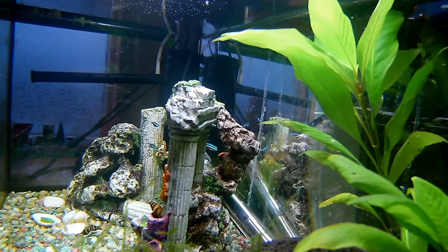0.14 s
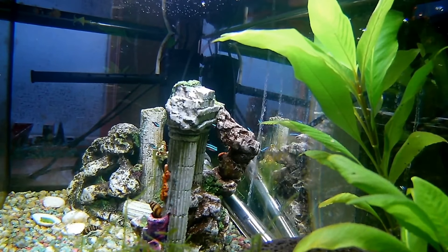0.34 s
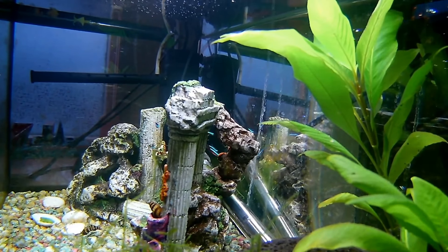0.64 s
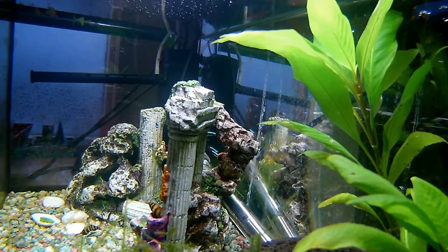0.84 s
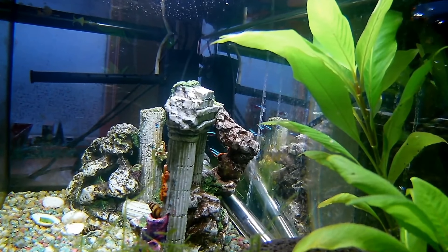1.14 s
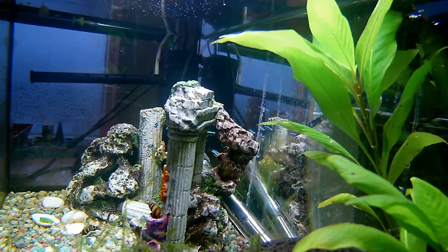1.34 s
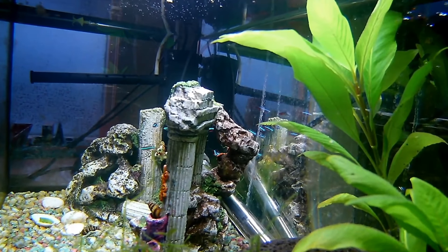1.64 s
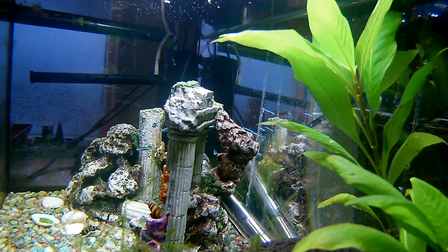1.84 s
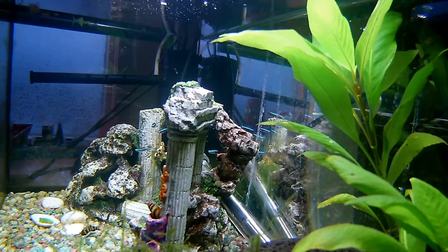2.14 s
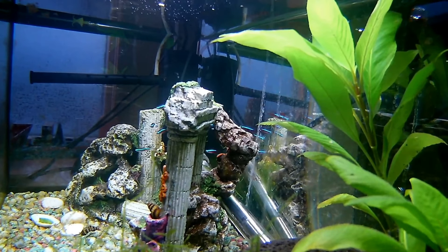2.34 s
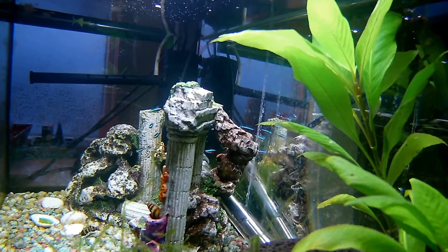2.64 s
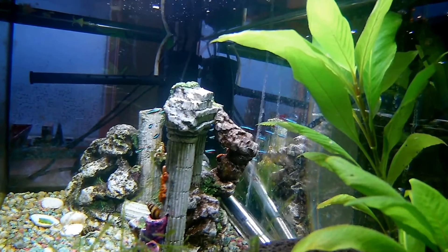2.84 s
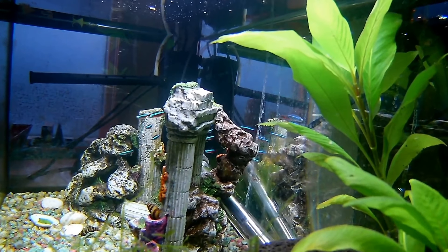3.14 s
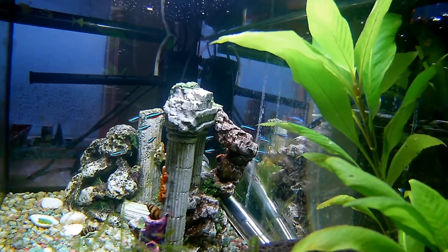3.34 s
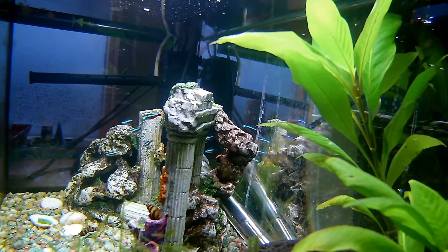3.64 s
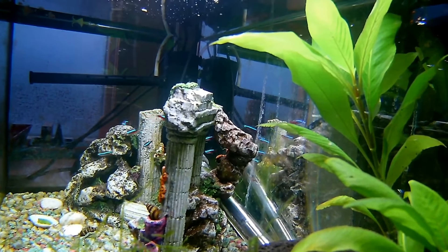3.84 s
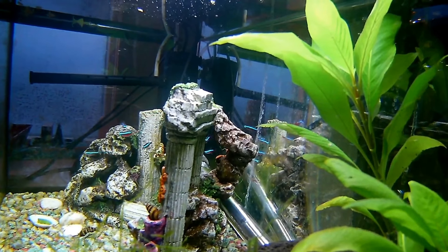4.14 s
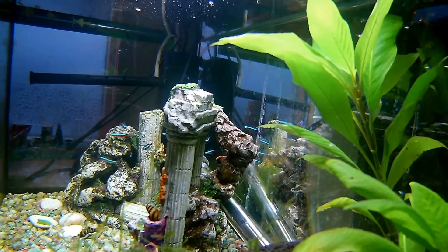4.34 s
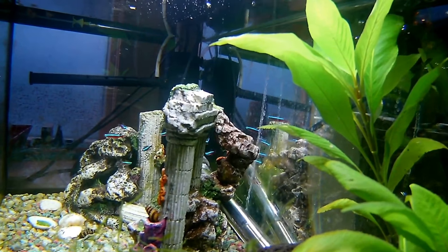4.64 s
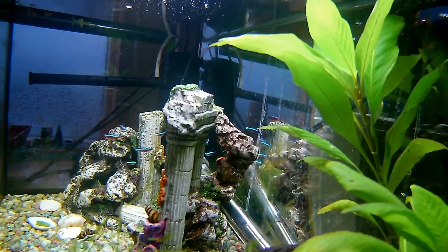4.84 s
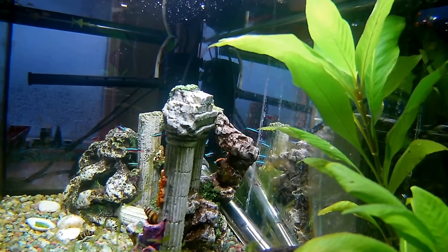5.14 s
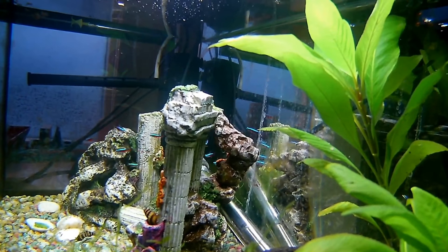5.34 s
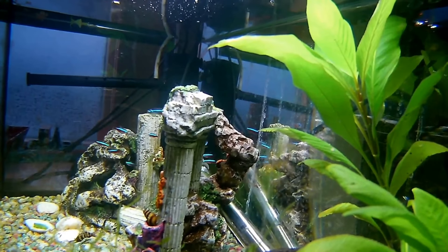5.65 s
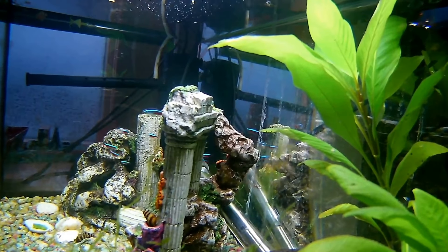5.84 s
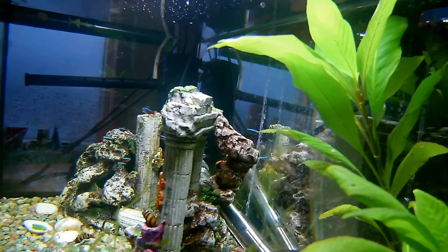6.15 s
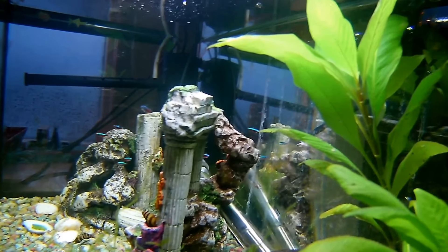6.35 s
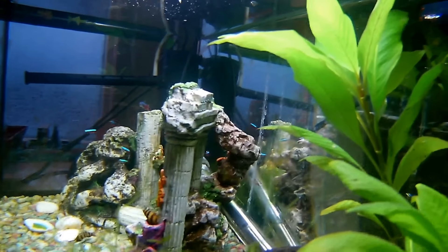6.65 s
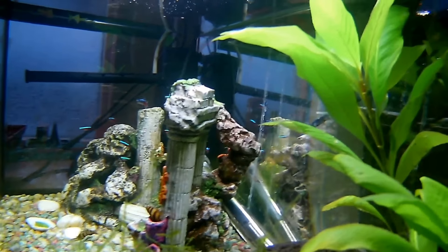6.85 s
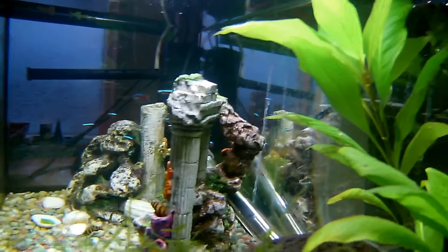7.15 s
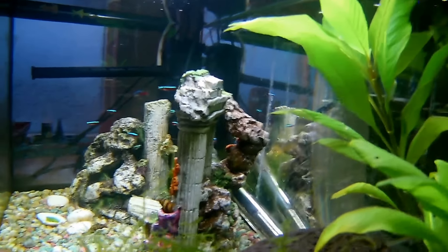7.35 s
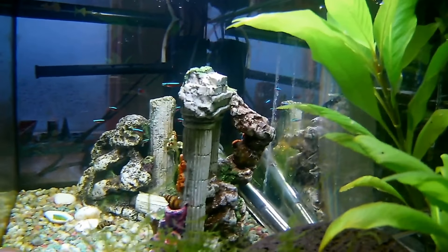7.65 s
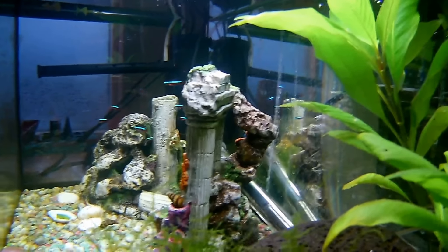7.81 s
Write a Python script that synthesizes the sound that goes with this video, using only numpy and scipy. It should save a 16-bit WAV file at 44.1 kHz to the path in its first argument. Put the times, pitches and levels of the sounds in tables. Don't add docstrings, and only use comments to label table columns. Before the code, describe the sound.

A fish tank filter pump drones steadily at a low mains pitch, with a soft rumbling of glass and faint gurgling from churned water. Very little changes for over six seconds. Then the hand-held device shifts with a low rumble and is knocked hard against its stand, a loud dry crack, followed by light fingertip taps, soft thuds and rustles over the continuing hum. Close, plain indoor pickup with slight hiss.

```python
import sys
import numpy as np
from scipy import signal
from scipy.fft import rfft, irfft, next_fast_len
from scipy.io import wavfile
from scipy.ndimage import uniform_filter1d

SR = 44100
rng = np.random.default_rng(int(sys.argv[2]) if len(sys.argv) > 2 else 0)


def invert_db(x):
    u = np.asarray(x, float) / 20
    return 10 ** u


def generate_wav(sig):
    pcm = np.round(np.clip(np.atleast_2d(sig).T, -1, 1) * 32767).astype(np.int16)
    wavfile.write(sys.argv[1], SR, pcm)


N = 351918


def shaped(gain, excite):
    size = next_fast_len(N)
    hz = np.maximum(np.arange(size // 2 + 1) * SR / size, 1e-3)
    spectrum = rfft(excite, size) * gain(hz) * np.sqrt(SR / 2)
    return irfft(spectrum, size)[:N]


def walk(rate):
    hold = int(SR / rate)
    steps = np.repeat(rng.standard_normal(N // hold + 1), hold)
    smooth = uniform_filter1d(uniform_filter1d(steps, hold), hold)
    return 1.3 * smooth[:N]


# (multiple of mains, level [dB rms])
HUM_LINES = [(1, -43), (2, -56), (3, -46), (4, -54.5), (5, -57), (6, -48.5), (7, -68), (8, -65), (9, -62.5),
             (10.5, -73.5), (11, -71), (12, -64)]
# (time [s], level [dB])
LEANING_LEVELS = [
    (0, -1),
    (5.2, 0),
    (5.7, 4.5),
    (6.4, 2),
    (6.7, -8),
    (7.0, 3),
    (7.5, 7),
    (7.98, -5),
]


def motor():
    mains_hz, wobble_db = 50.0, 0.35
    phase = 2 * np.pi * np.cumsum(mains_hz + 0.04 * walk(0.7)) / SR
    leaning_db = np.interp(np.arange(N) / SR, *np.transpose(LEANING_LEVELS))
    hum = np.zeros(N)
    for multiple, db in HUM_LINES:
        level_db = db + wobble_db * np.sqrt(multiple) * walk(3)
        if multiple == 2:
            level_db = level_db + leaning_db
        lag = 0.55 * multiple ** 2 + 2.3
        hum += np.sqrt(2) * invert_db(level_db) * np.cos(multiple * phase - lag)
    return hum


def ringing(modes, shared_db, flicker_db, rate):
    out = np.zeros(N)
    for hz, width, db in modes:
        turbulence, flicker = rng.standard_normal(N), walk(rate)
        glint_db = flicker_db * (flicker + 0.3 * flicker ** 2)
        drive = turbulence * invert_db(shared_db + glint_db)

        def resonance(f):
            detuning = 1.424 * (f - hz * hz / f) / 2 / width
            return invert_db(db) / (1 + detuning ** 2) ** 1.54

        out += shaped(resonance, drive)
    return out


# (frequency [Hz], width [Hz], level [dB per Hz])
TANK_MODES = [(35, 22, -74), (110, 48, -76.5), (182, 39, -71.5), (209, 7.9, -64), (245, 37, -67.5),
              (277.5, 65, -73), (317, 180, -80.5), (391.4, 48, -74.5), (450, 55, -74.5), (651, 40, -73.5),
              (703, 49, -77.5), (797, 118, -79.5), (916, 27, -85)]
# (frequency [Hz], width [Hz], level [dB per Hz])
HOUSING_MODES = [(970, 94, -95.5), (1149, 145, -90.5), (1338, 45, -84), (1528, 144, -87.5),
                 (1716, 108, -83), (1856, 76, -85), (2001, 125, -82.5), (2262, 215, -87.5), (2534, 46, -94),
                 (2780, 120, -97), (3185, 244, -90), (3960, 340, -103), (4314, 170, -106)]


def water():
    surge_db = 0.4 * walk(5) + 1.1 * walk(35)
    tank = ringing(TANK_MODES, 0.3 * surge_db, flicker_db=0.6, rate=6)
    housing = ringing(HOUSING_MODES, surge_db, flicker_db=1.4, rate=22)
    return tank + housing


# (frequency [Hz], level [dB per Hz])
HISS_CURVE = [(30, -93), (150, -82.5), (550, -81), (1000, -90.5), (2400, -100), (4900, -117), (7500, -123),
              (15500, -120)]


def hiss():
    hz, db = np.transpose(HISS_CURVE)
    return shaped(lambda f: invert_db(np.interp(np.log(f), np.log(hz), db)), rng.standard_normal(N))


# (time [s], rumble level [dB], rustle level [dB], length [s])
GRIP_CHANGES = [(5.1, -62, -105, .1), (6.25, -60, -105, .15), (6.468, -43.5, -100, 0.23),
                (6.807, -35, -80.5, .06), (6.99, -45, -104, .04), (7.19, -47, -84, 0.068),
                (7.303, -46, -80, 0.069), (7.43, -42, -88, 0.089), (7.713, -46, -91, .06),
                (7.874, -40, -88, 0.026), (7.964, -44, -100, .03)]


def grips(column, late_s, longer):
    rows, t = np.array(GRIP_CHANGES), np.arange(N) / SR
    since = (t - rows[:, :1] - late_s) / (longer * rows[:, 3:])
    fade = np.where(since < 0, (since / 0.59) ** 2, since)
    return invert_db(rows[:, column]) @ np.exp(-fade)


def hands():
    def bass(f):
        low_cut = (f / 18) ** 2 / (1 + (f / 18) ** 2)
        return low_cut / (1 + (f / 150) ** 2) / 10

    def skin(f):
        return 1 / (1 + ((f - 4500) / 1800) ** 4) / 50

    rumble = shaped(bass, rng.standard_normal(N)) * invert_db(2 * walk(15))
    rustle = shaped(skin, rng.standard_normal(N)) * invert_db(3 * walk(150))
    return rumble * grips(1, late_s=0, longer=1) + rustle * grips(2, late_s=0.045, longer=1.4)


# (frequency [Hz], level [dB], time to fall 60 dB [s])
BODY_MODES = [(90, -11, 0.015), (120, -24.5, 0.25), (190, -16.5, 0.044), (244.3, -9, 0.17),
              (276, -3.5, 0.09), (356, 10.5, 0.034), (432, -11, 0.036), (497, 7, 0.025), (578, 0, 0.049),
              (640, -0.5, 0.052), (804, 22.5, 0.014), (1010, -10.5, .02), (1208, 21.5, 0.017),
              (1440, -20, .02)]
# (time [s], signed force, struck spot [Hz], spread [octaves], ring time [times the free body's])
KNOCK_HITS = [
    (6.777, 1.68, 382, 1, 1.26),
    (6.7784, -1.25, 391, 1.15, 0.21),
    (6.7847, 1, 389, 0.74, 0.85),
    (6.7900, 0.00033, 237, 0.23, 1.7),
    (6.7970, -0.074, 262, 0.21, 0.58),
    (6.8150, .02, 640, 0.14, 2.7),
]
# (time [s], signed force, struck spot [Hz], spread [octaves])
FINGER_TAPS = [(6.9800, 0.12, 357, 0.52), (6.986, -0.065, 250, 0.85), (7.0365, 0.017, 820, 0.45),
               (7.1703, 0.032, 360, 0.55), (7.1975, 0.034, 800, 0.41), (7.1982, -.075, 340, 0.44),
               (7.2276, -0.03, 400, 0.3), (7.2301, 0.057, 430, 0.51), (7.2490, 0.042, 372, 0.34),
               (7.3100, -0.016, 250, .6), (7.3245, 0.08, 420, 0.6), (7.3272, -0.1, 557, 0.26),
               (7.336, 0.03, 600, 0.16), (7.4065, -0.039, 750, .5), (7.4083, 0.015, 1490, 0.085),
               (7.8763, 0.12, 460, 0.47), (7.8784, 0.074, 352, 0.12)]
# (time [s], signed force, struck spot [Hz])
SOFT_THUDS = [(6.778, -0.19, 110), (6.803, 0.074, 125), (6.8400, 0.047, 200), (6.8550, 0.058, 115),
              (6.996, -0.017, 90), (7.3280, 0.035, 200), (7.425, 0.02, 200), (7.407, .04, 190),
              (7.8784, -0.036, 88), (7.9250, -0.01, 120), (7.947, 0.027, 100), (7.965, -0.042, 132)]


def taps():
    out, t = np.zeros(N + SR), np.arange(SR // 3) / SR
    hz, db, t60 = np.transpose(BODY_MODES)
    hits = list(KNOCK_HITS)
    for s, force, spot_hz, spread in FINGER_TAPS:
        hits.append((s, force, spot_hz, spread, 0.63 / spread ** 0.48))
    for s, force, spot_hz in SOFT_THUDS:
        hits.append((s, force, spot_hz, 0.59, 0.98))
    for s, force, spot_hz, spread, ring_time in hits:
        octaves_away = np.log2(hz / spot_hz)
        share = invert_db(db) * np.exp(-0.5 * (octaves_away / spread) ** 2)
        decay = np.exp(-np.log(1000) * t / (ring_time * t60[:, None]))
        ring = share @ (decay * np.sin(2 * np.pi * hz[:, None] * t))
        contact_s = 0.44 / spot_hz
        push = np.sin(np.pi * np.clip(t[:900] / contact_s, 0, 1)) ** 2
        rebound = np.roll(push, int(contact_s * SR))
        ring = np.convolve(ring, push - 0.75 * rebound)[:len(t)]
        out[int(s * SR):][:len(t)] += force * ring / np.abs(ring).max()
    return out[:N]


# (time [s], level [dB], brightest [Hz], decay [ms])
EDGE_CRACKS = [
    (6.7770, -8, 5600, 1.2),
    (6.778, -31, 15060, 1.1),
    (6.7805, -10, 4570, 2.0),
    (6.784, -14, 4700, 1.1),
    (6.788, -25, 4200, 1.6),
    (7.407, -34.5, 5700, 1.6),
]


def cracks():
    out, ms = np.zeros(N + SR), np.arange(1000) * 1000 / SR
    for s, db, top_hz, decay_ms in EDGE_CRACKS:
        grit = rng.standard_normal(len(ms))
        burst = grit * ms / decay_ms * np.exp(-2 * ms / decay_ms)
        plastic = signal.butter(5, [1200, top_hz], "band", fs=SR, output="sos")
        out[int(s * SR):][:len(ms)] += invert_db(db) * signal.sosfilt(plastic, burst)
    return out[:N]


def scene():
    return (motor() + water() + hands() + taps() + cracks())[None]


def low_pass(x):
    return signal.sosfilt(signal.butter(12, 15980, fs=SR, output="sos"), x)


def record(dry):
    ceiling, top_hz = 0.98, 15680
    x = dry / ceiling
    flat = ceiling * x / (1 + np.abs(x) ** 12) ** (1 / 12)
    top_cut = signal.ellip(12, 0.2, 80, top_hz, fs=SR, output="sos")
    mix = signal.sosfilt(top_cut, flat + hiss())
    return low_pass(mix)


dry = scene()
out = record(dry)
generate_wav(out)
```